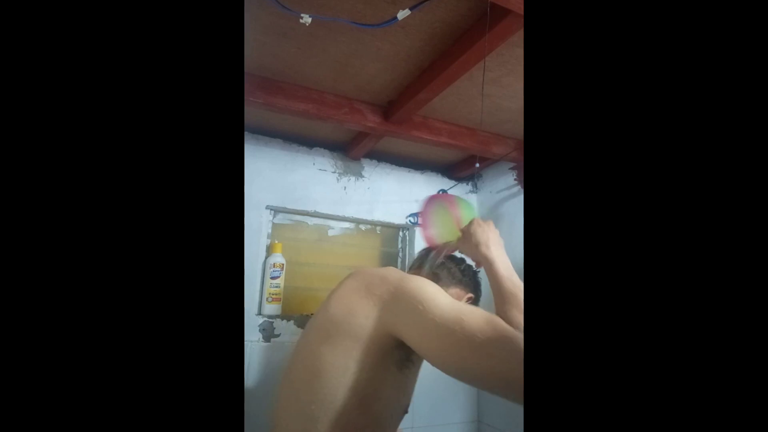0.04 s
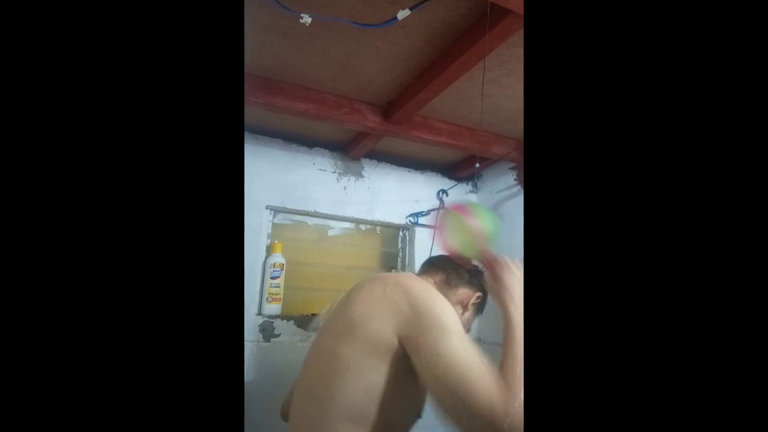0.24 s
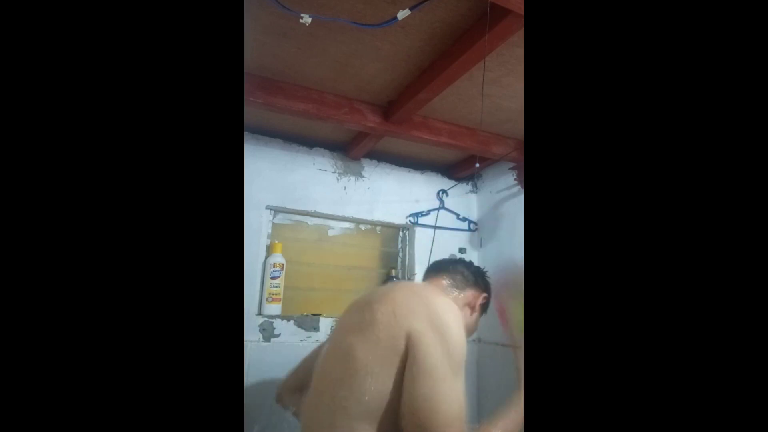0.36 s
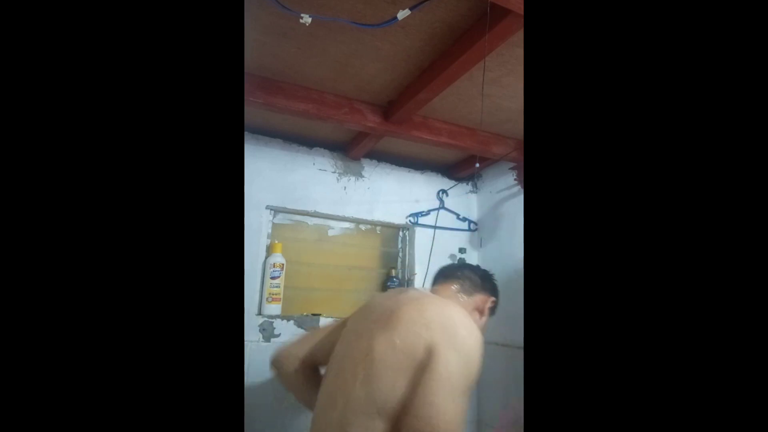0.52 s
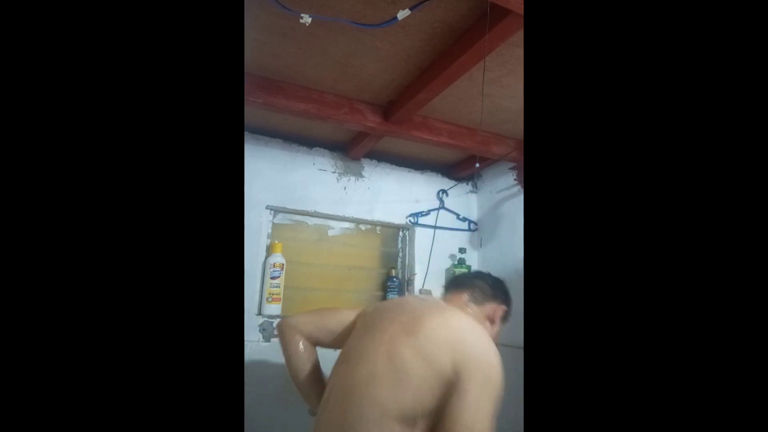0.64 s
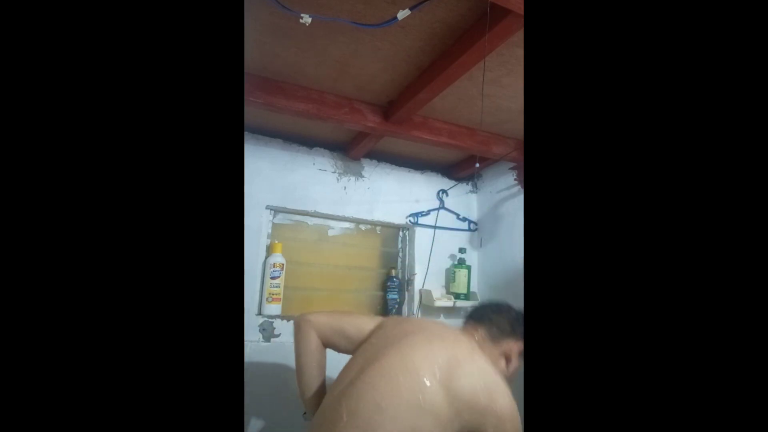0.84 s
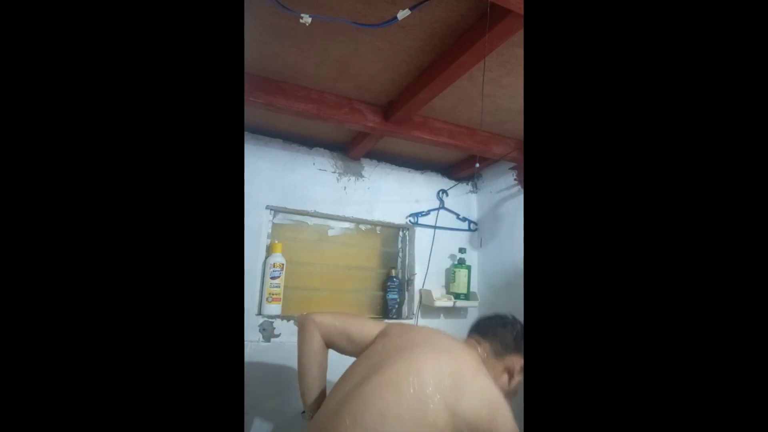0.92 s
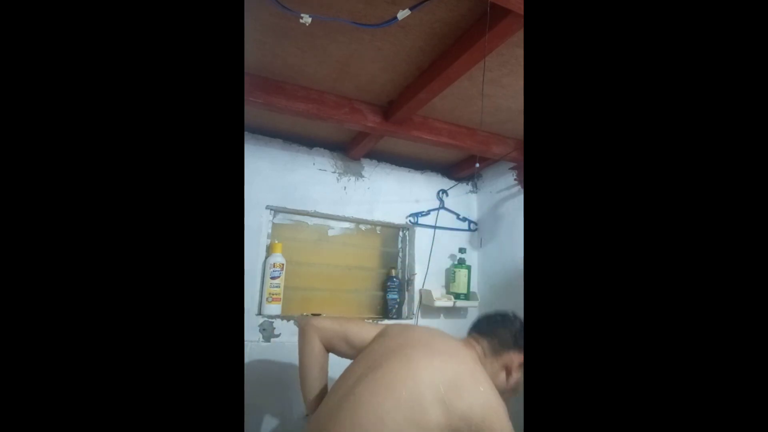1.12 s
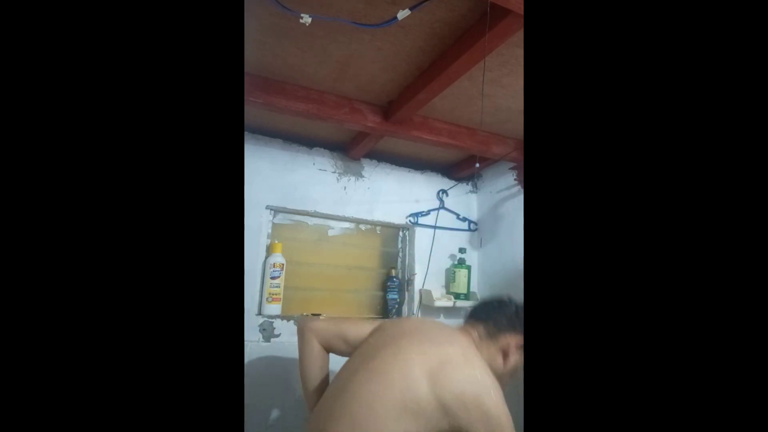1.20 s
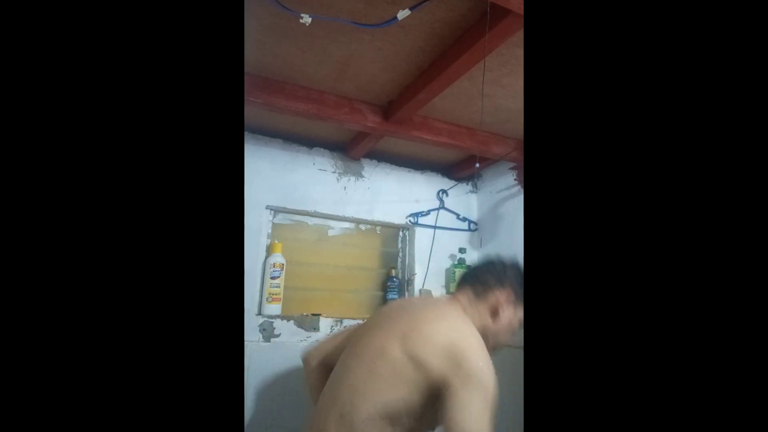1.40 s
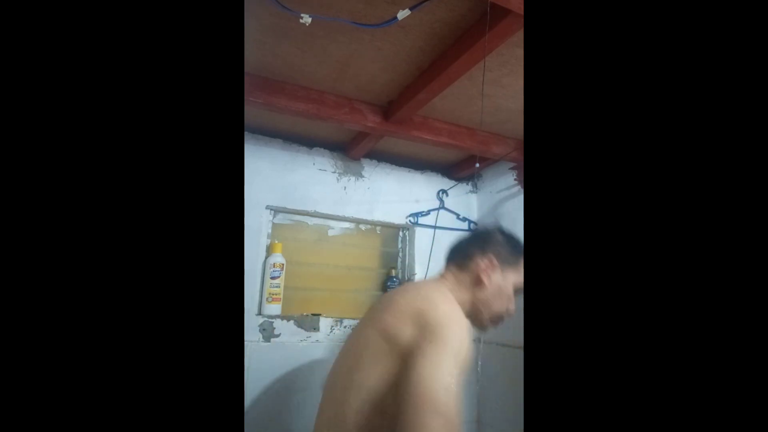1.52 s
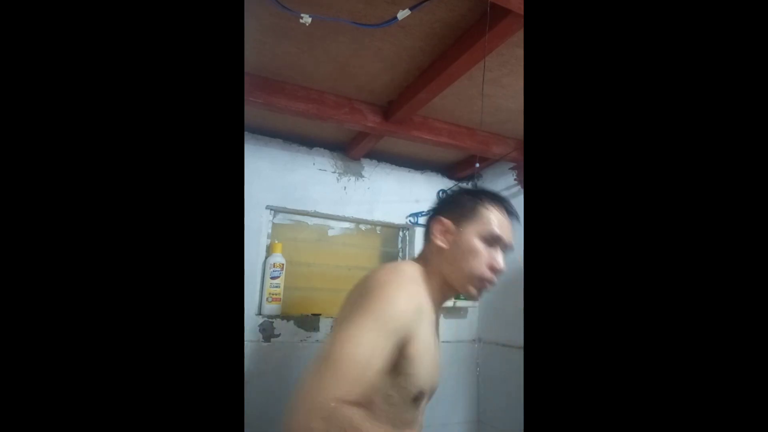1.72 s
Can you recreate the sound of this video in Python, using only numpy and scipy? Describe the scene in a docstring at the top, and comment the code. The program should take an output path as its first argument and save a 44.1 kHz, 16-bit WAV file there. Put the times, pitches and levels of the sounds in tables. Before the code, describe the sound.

Water poured from a dipper runs off someone's body, pattering and slapping onto the floor of a small tiled bathroom. The dipper then plunges twice into a bucket with hollow gulps, over a thin trickle and a faint throbbing motor hum.

```python
"""Small tiled bathroom: someone bathes from a dipper. Poured water runs off the body and patters on
the floor as drop impacts and tiny ringing bubbles; sheets slosh, heavier dollops slap down. The dipper
plunges twice into a bucket and fills, trapped air ringing in hollow gulps. A thin trickle keeps running.
In the background a motor throbs low as its close hum lines beat."""
import sys
import numpy as np
from scipy import signal
from scipy.fft import rfft, irfft
from scipy.io import wavfile

SR = 44100
rng = np.random.default_rng(int(sys.argv[2]) if len(sys.argv) > 2 else 0)


def put_to_file(sound):
    """Save the sound as 16-bit audio at rate SR, in the file named by the first command-line argument."""
    columns = np.atleast_2d(sound).T  # one column per channel
    safe = np.clip(columns, -1, 1)
    whole_steps = np.round(safe * 32767)
    wavfile.write(sys.argv[1], SR, whole_steps.astype(np.int16))


N = 77175

# water landing on the floor; spray thrown up (time [s], level [dB])
RUNOFF_LEVEL = [(0, -46.5), (.07, -56), (.16, -48), (.26, -31.5), (.34, -46), (.41, -42.5), (.46, -55),
                (.5, -61), (.525, -33.5), (.55, -29), (.61, -33), (.66, -27.5), (.82, -30), (.89, -35.5),
                (1.02, -38.5), (1.16, -38.5), (1.33, -33.5), (1.42, -39.5), (1.55, -46.5), (1.62, -49.5),
                (1.75, -41)]
SPRAY_LEVEL = [(0, -37), (.08, -49), (.17, -63), (.2, -57), (.28, -38), (.34, -48), (.4, -45.5), (.49, -44),
               (.6, -38.5), (.66, -25.5), (.78, -37.5), (.95, -34), (1.08, -41), (1.16, -41), (1.35, -49),
               (1.6, -45), (1.75, -42.5)]
# sheets of water; dipper churning the bucket (time [s], rise [s], decay [s], level [dB])
SLOSH_BURSTS = [(0.213, 0.06, 0.042, -29.5), (.3, 0.071, 0.017, -39.5), (.53, 0.027, 0.068, -40),
                (0.647, 0.0044, 0.024, -31), (.82, 0.0055, 0.056, -38.5), (0.898, 0.0089, 0.037, -33),
                (1.429, 0.013, 0.04, -39), (1.688, 0.0072, 0.091, -40.5)]
PLUNGE_BURSTS = [(0.939, 0.028, 0.16, -40), (1.044, 0.0065, 0.1, -25), (1.11, 0.0099, 0.04, -30.5),
                 (1.159, 0.0086, 0.017, -34.5), (1.242, 0.0023, 0.039, -23.5)]
# dollops on the tiles (time [s], level [dB], centre [Hz], sigma [octaves], decay [s])
DOLLOPS = [(.0662, -38, 4850, 0.63, 0.021), (.105, -46.5, 3130, 0.075, 0.039),
           (.187, -31, 6900, 0.44, 0.015), (.4329, -38.5, 6900, 0.34, 0.0097),
           (0.4997, -34, 6300, .35, .004), (.5, -31, 6900, .11, 0.023), (0.509, -45.5, 344, 0.16, 0.049),
           (0.5467, -23.5, 6700, 0.44, 0.0066), (.617, -25.5, 4500, 0.18, 0.0067),
           (.621, -27.5, 4400, .22, 0.0077), (.65, -34, 456, 1, 0.036), (0.6993, -24.5, 3250, 0.48, 0.017),
           (0.711, -18, 3870, 0.24, 0.014), (0.74, -23.5, 4030, 0.34, 0.048),
           (.7617, -18.5, 3700, .17, 0.02), (0.807, -23.5, 5940, 0.47, 0.035),
           (0.83, -25, 3200, 0.18, 0.019), (0.9075, -32, 7000, 0.32, 0.028),
           (1.218, -23, 6160, 0.35, 0.027), (1.219, -26, 3400, 0.34, 0.019),
           (1.2982, -25.5, 4170, 0.8, 0.012), (1.401, -33, 6050, 0.73, 0.027),
           (1.4765, -28.5, 12900, 1, 0.022), (1.4765, -43, 6000, 0.4, 0.02), (1.52, -41, 5250, 0.11, 0.029),
           (1.567, -43.5, 4460, .7, 0.031), (1.64, -32, 7000, 0.61, 0.032),
           (1.696, -32.5, 2330, 0.16, 0.017)]
# ringing air pockets (time [s], pitch [Hz], peak [dB], swell [s])
AIR_POCKETS = [(.281, 897, -32.5, 0.0044), (.312, 1020, -29.5, 0.0023), (.547, 1110, -31.5, 0.0052),
               (0.712, 1350, -26.5, 0.0011), (.884, 643, -35.5, 0.0061), (1.046, 588, -15, 0.0061),
               (1.051, 1190, -25, .004), (1.052, 1770, -24, 0.002), (1.062, 491.4, -13.5, 0.014),
               (1.083, 615, -19, 0.0065), (1.098, 493, -16.5, 0.0039), (1.116, 2740, -32.5, 0.0079),
               (1.117, 522, -21, 0.0037), (1.142, 485, -24.5, 0.0076), (1.165, 790, -25.5, 0.0061),
               (1.166, 475, -37, 0.018), (1.18, 1210, -27, 0.0041), (1.243, 460, -17, 0.003),
               (1.243, 1673, -20, 0.0036), (1.246, 1175, -28, 0.0045), (1.249, 917, -26.5, 0.013),
               (1.253, 490, -16, 0.0075), (1.271, 358.8, -21.5, 0.012), (1.29, 380, -30.5, 0.0047),
               (1.321, 403, -28, 0.0035), (1.431, 1003, -34.5, 0.0033), (1.43, 1433, -33.5, 0.0037),
               (1.434, 1783, -34, .004), (1.571, 1880, -36.5, 0.0025)]
# trickle resonances (centre [Hz], width [Hz], relative level [dB])
TRICKLE_BANDS = [(2450, 98, -9), (3830, 230, -4.5), (5660, 230, 1.5), (6700, 970, 1)]
# spectra of the water noises and room air (frequency [Hz], relative density [dB])
RUNOFF_SPECTRUM = [(20, -70), (150, -30), (700, -50), (1250, -20), (1900, -11), (2700, -10), (3500, 0.5),
                   (4700, -2), (6800, 4.5), (10000, -3), (16000, -13)]
BIG_DROP_SPECTRUM = [(20, -56), (150, 11.5), (350, -7), (700, -10), (1250, -4.5), (1900, 0), (3000, -1.5),
                     (6000, -11), (16000, -31)]
SPRAY_SPECTRUM = [(300, -3), (4000, -19), (8000, -1.5), (11000, -3), (16000, -4)]
SLOSH_SPECTRUM = [(20, -70), (150, -53), (400, -14.5), (950, -9), (1500, -3), (2500, -2.5), (3700, -1),
                  (6000, -7.5), (9000, -41), (16000, -65)]
PLUNGE_SPECTRUM = [(20, -70), (70, -40), (150, -1), (280, -6), (450, -4), (800, 0), (1250, -7), (1700, -7),
                   (2200, -10.5), (3200, -8), (6500, -13.5), (16000, -35)]
AIR_SPECTRUM = [(20, -9), (60, -12), (100, 2), (130, 12.5), (190, -0.5), (250, 9), (300, -19), (350, 4),
                (410, -13.5), (490, -12.5), (560, -3.5), (750, -16.5), (950, -12), (1120, -10),
                (1270, -1.5), (1500, -45), (2100, -55), (6000, -36), (16000, -37)]
# motor hum (frequency [Hz], rms level [dB])
HUM_LINES = [(109.9, -61), (119.9, -43.5), (129.9, -45.5), (139.9, -58), (149.9, -60), (159.9, -58),
             (229.7, -58), (239.7, -49.5), (249.7, -59)]
# tile reverberation (frequency [Hz], T60 [s])
TILE_T60 = [(150, 0.17), (600, 0.29), (2000, 0.34), (6000, 0.08), (15000, 0.42)]
# room standing waves (frequency [Hz], width [Hz], gain [dB])
MODES = [(354, 11, -4), (490, 20, -26), (514, 11, -40), (655, 10, -21), (745, 16, -26), (790, 48, -10),
         (892, 6, -3), (1255.5, 31, 5.5)]
# microphone response (frequency [Hz], gain [dB])
MIC_RESPONSE = [(20, -24), (90, -1), (5000, 1.5), (7000, 3), (7500, -4), (8000, -11), (9000, -4.5),
                (13800, -5), (14800, 1.5), (16000, 7)]


def runoff():
    """Drops and tiny bubbles on the wet floor; big drops join in strong flow."""
    patter = drops(2600, spread_db=4, wash=.45)
    patter += amp(-7.5) * fizz(1100, low_hz=2012, high_hz=7135, decay_cycles=9.4, spread_db=1.5)
    big = drops(880, spread_db=1.5, wash=.6)
    big += amp(-5) * fizz(500, low_hz=689, high_hz=2785, decay_cycles=12.2, spread_db=4)
    flow = gain_curve(RUNOFF_LEVEL)
    flow_db = 20 * np.log10(flow)
    big_gain = amp(-7) / (1.5 + np.exp((-46.5 - flow_db) / 2))  # soft gate
    return flow * (shaped(patter, RUNOFF_SPECTRUM) + big_gain * shaped(big, BIG_DROP_SPECTRUM))


def spray(spurt_rms_db=3.6, spurt_hz=28):
    """Fine mist thrown up by the stream in uneven spurts."""
    mist = shaped(drops(2000, spread_db=2, wash=.25), SPRAY_SPECTRUM)
    spurts = amp(spurt_rms_db * slow_noise(spurt_hz, N))
    return gain_curve(SPRAY_LEVEL) * spurts * mist


def sloshes():
    """Sheets of water break up in bubbly splashes."""
    grain = drops(3000, spread_db=2.5, wash=.5)
    grain += amp(-9) * fizz(900, low_hz=700, high_hz=4000, decay_cycles=7, spread_db=2)
    power = sum((amp(db) * burst(*timing_s)) ** 2 for *timing_s, db in SLOSH_BURSTS)
    return shaped(grain, SLOSH_SPECTRUM) * np.sqrt(power)


def slaps(rise_s=.0005, skirt_db=-20):
    """Each dollop hits the tiles as a noise burst in one band."""
    out, octave = np.zeros(N), np.log2(np.fft.rfftfreq(N, 1 / SR) + 1)
    for start_s, db, hz, sigma_oct, decay_s in DOLLOPS:
        offset_oct = octave - np.log2(hz)
        band = np.exp(-.5 * (offset_oct / sigma_oct) ** 2) + amp(skirt_db) * np.exp(-.5 * offset_oct ** 2)
        noise = unit_rms(irfft(rfft(rng.standard_normal(N)) * band, N))
        out += amp(db) * burst(start_s, rise_s, decay_s) * noise
    return out


def plunges(highpass_hz=117):
    """Water rushes into the dipper and churns."""
    grain = drops(2200, spread_db=1.5, wash=.31)
    grain += amp(-14.5) * fizz(900, low_hz=341.5, high_hz=3050, decay_cycles=5.3, spread_db=0)
    envelope = sum(amp(db) * burst(*timing_s) for *timing_s, db in PLUNGE_BURSTS)
    churn = envelope * shaped(grain, PLUNGE_SPECTRUM)
    return signal.lfilter(*signal.butter(3, highpass_hz, "high", fs=SR), churn)


def bubbles(glide_per_s=.18, jostle_hz=127):
    """Trapped air rings, jostled by the water: large pockets gulp, small ones plink."""
    out, t = np.zeros(N + SR), np.arange(SR // 8) / SR
    for start_s, hz, db, swell_s in AIR_POCKETS:
        wobble, flutter = slow_noise(jostle_hz, (2, len(t)))
        swell = (t / swell_s * np.exp(1 - t / swell_s)) ** 1.69
        phase_rad = 2 * np.pi * hz * t * (1 + glide_per_s * t / 2) + .3 * wobble
        out[round(start_s * SR):][:len(t)] += amp(db) * swell * (1 + .15 * flutter) * np.sin(phase_rad)
    return out[:N]


def trickle(rms_db=-52):
    """Droplets ring steadily in a few narrow bands."""
    hits, out = drops(900, spread_db=4, wash=.2), np.zeros(N)
    for hz, width_hz, db in TRICKLE_BANDS:
        band = signal.butter(2, [hz - width_hz / 2, hz + width_hz / 2], "band", fs=SR)
        out += amp(db) * unit_rms(signal.lfilter(*band, hits))
    return amp(rms_db) * unit_rms(out)


def motor(first_throb_s=.04):
    """Hum lines 10 Hz apart beat into a throb every 0.1 s."""
    t = np.arange(N) / SR - first_throb_s
    return np.sqrt(2) * sum(amp(db) * np.cos(2 * np.pi * hz * t) for hz, db in HUM_LINES)


def room_air(rms_db=-51):
    """Faint moving air."""
    return amp(rms_db) * shaped(rng.standard_normal(N), AIR_SPECTRUM)


def tile_reverb(x, wet_db, predelay_s=.003):
    """Dense reflections off close walls; each band decays at its own rate."""
    n = SR // 2
    taps = rng.standard_normal(n) * (rng.random(n) < .12) * (np.arange(n) > predelay_s * SR)
    hz, t, bands = signal.stft(taps, SR, nperseg=256)
    decay = amp(-60 * t / log_interp(TILE_T60, hz)[:, None])
    tail = signal.istft(bands * decay, SR, nperseg=256)[1]
    wet = signal.fftconvolve(x, tail / np.linalg.norm(tail))[:N]
    return (x + amp(wet_db) * wet) / np.sqrt(1 + amp(wet_db) ** 2)


def standing_waves(x):
    """The small room rings on at a few pitches."""
    return x + sum(amp(db) * signal.lfilter(*signal.iirpeak(hz, hz / width_hz, SR), x)
                   for hz, width_hz, db in MODES)


def drops(per_s, spread_db, wash):
    """Random uneven impacts; wash is the power share of countless tiny ones."""
    size = sizes(spread_db) * rng.choice([-1, 1], N)
    impacts = unit_rms(size * (rng.random(N) < per_s / SR))
    return np.sqrt(1 - wash) * impacts + np.sqrt(wash) * rng.standard_normal(N)


def fizz(per_s, low_hz, high_hz, decay_cycles, spread_db, pitches=28):
    """Swarm of small bubbles, each a short ring rising in pitch."""
    onsets = sizes(spread_db) * (rng.random(N) < per_s / SR)
    pitch_index = rng.integers(0, pitches, N)
    out, t = np.zeros(N), np.arange(2048) / SR
    for k, hz in enumerate(np.geomspace(low_hz, high_hz, pitches)):
        age = t * hz / decay_cycles
        rising_hz = hz * (1 + .024 * np.minimum(age, 5))
        ring = np.exp(-age) * np.sin(2 * np.pi * np.cumsum(rising_hz) / SR)
        out += signal.oaconvolve(onsets * (pitch_index == k), ring)[:N]
    return unit_rms(out)


def sizes(spread_db):
    """Random gains: many small, few large."""
    return amp(spread_db * np.minimum(rng.exponential(1, N), 4))


def burst(start_s, rise_s, decay_s):
    """Linear rise, exponential decay."""
    t = np.arange(N) / SR - start_s
    return np.clip(t / rise_s, 0, 1) * np.exp(-np.maximum(t - rise_s, 0) / decay_s)


def slow_noise(cutoff_hz, shape):
    return unit_rms(signal.lfilter(*signal.butter(2, cutoff_hz, fs=SR), rng.standard_normal(shape)))


def amp(db):
    return 10 ** (np.asarray(db) / 20)


def unit_rms(x):
    return x / np.sqrt(np.mean(x ** 2) + 1e-20)


def gain_curve(points):
    return amp(np.interp(np.arange(N) / SR, *np.transpose(points)))


def log_interp(points, hz):
    knots_hz, values = np.transpose(points)
    return np.interp(np.log(hz + 1), np.log(knots_hz + 1), values)


def filtered(x, spectrum):
    gain = amp(log_interp(spectrum, np.fft.rfftfreq(2 * N, 1 / SR)))
    return irfft(rfft(x, 2 * N) * gain)[:N]


def shaped(x, spectrum):
    return unit_rms(filtered(x, spectrum))


def scene():
    """Water in the tiled room; motor and air behind it."""
    splashes = runoff() + spray() + trickle() + sloshes() + slaps() + plunges()
    water = tile_reverb(splashes, wet_db=-7.5) + tile_reverb(bubbles(), wet_db=-8)
    return (standing_waves(water) + motor() + room_air())[None]


def record(dry):
    """Microphone response, then a 15.6 kHz low-pass."""
    lowpass = signal.firwin(401, 15600, window=("kaiser", 8), fs=SR)
    return signal.oaconvolve(filtered(dry[0], MIC_RESPONSE), lowpass, "same")[None]


dry = scene()
out = record(dry)
put_to_file(out)
```